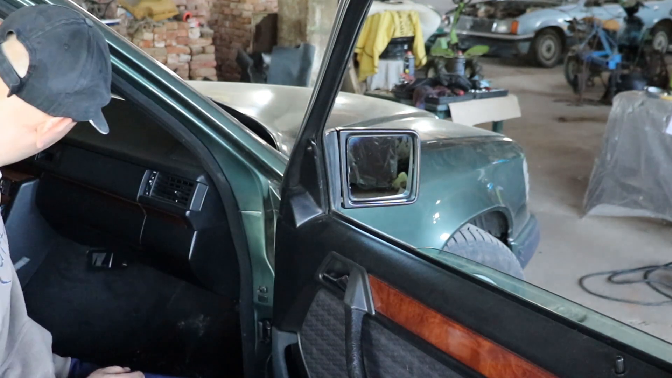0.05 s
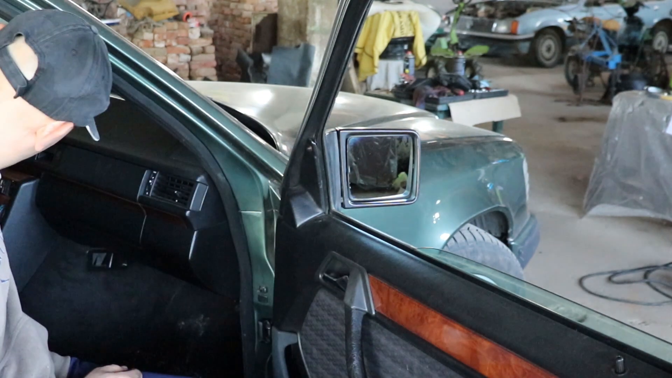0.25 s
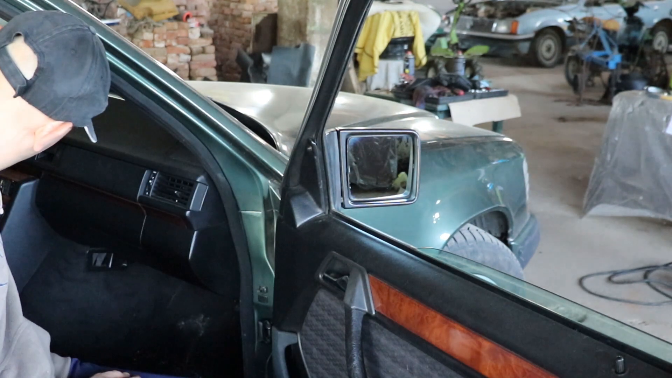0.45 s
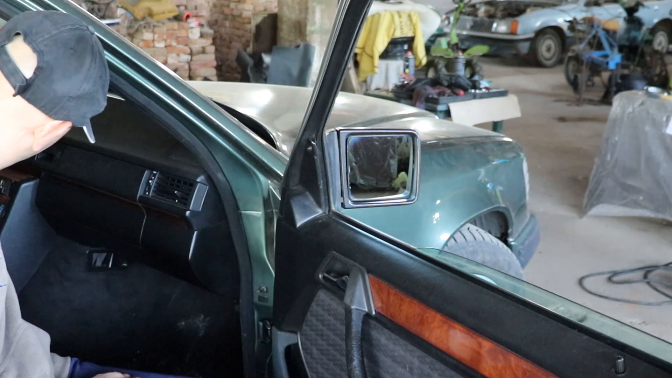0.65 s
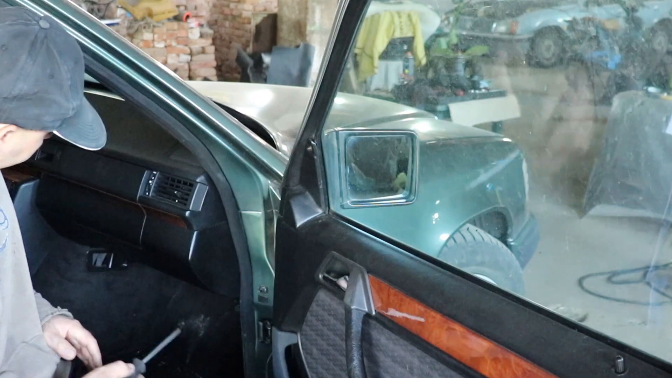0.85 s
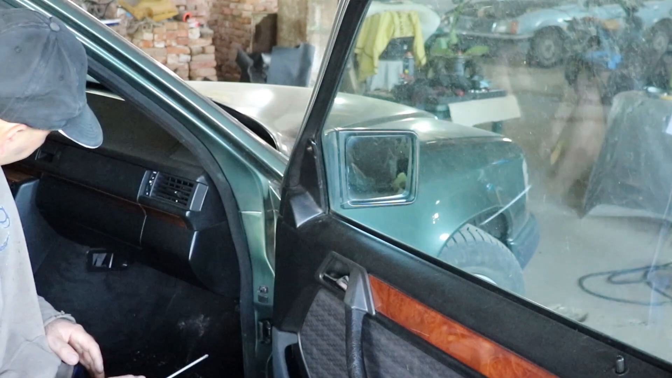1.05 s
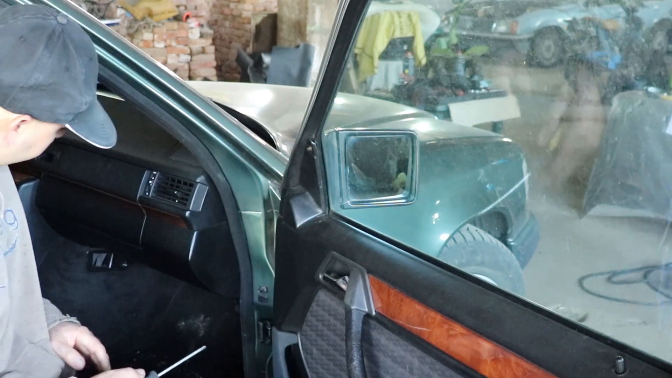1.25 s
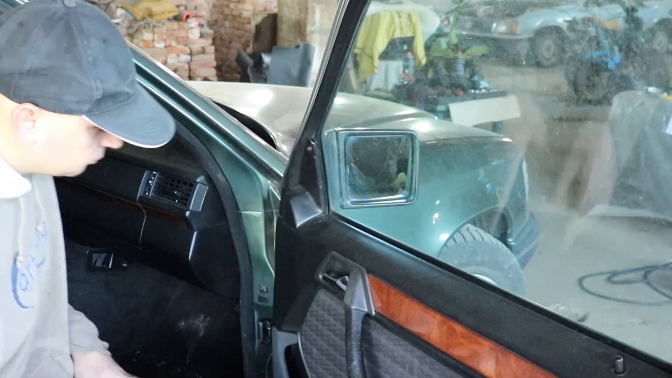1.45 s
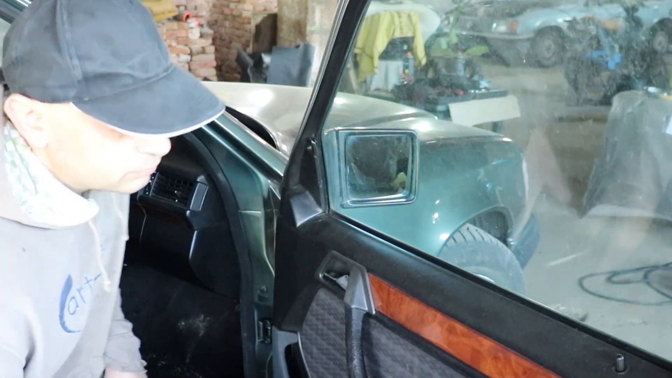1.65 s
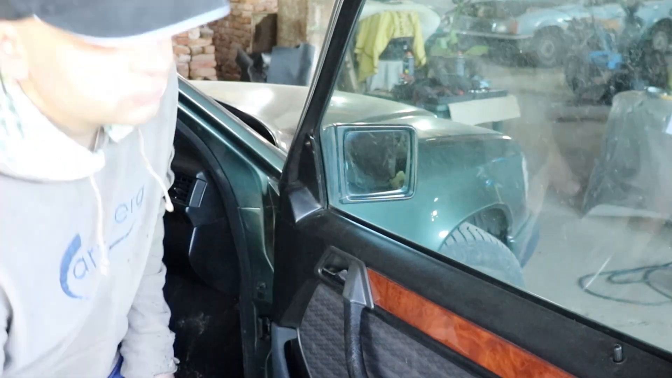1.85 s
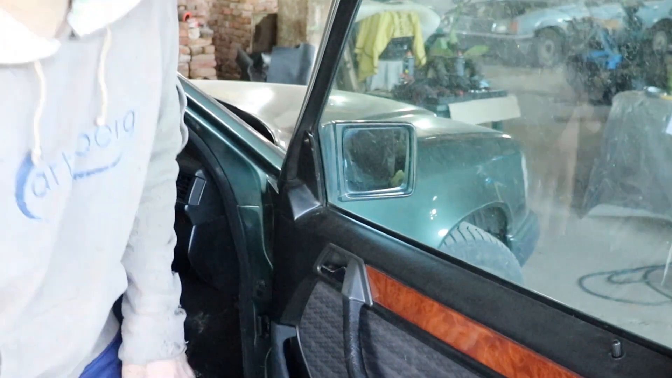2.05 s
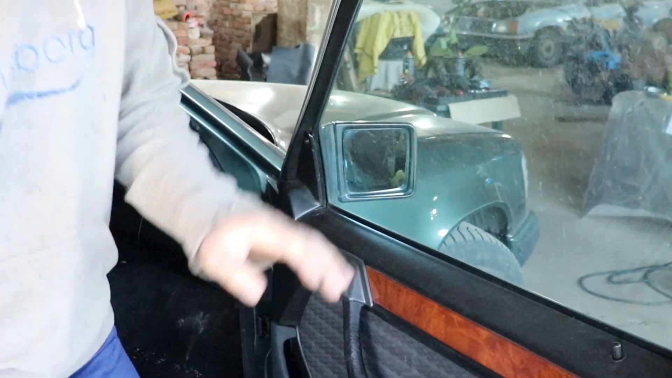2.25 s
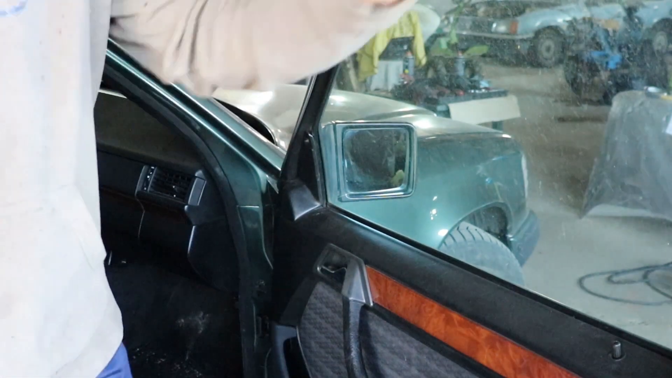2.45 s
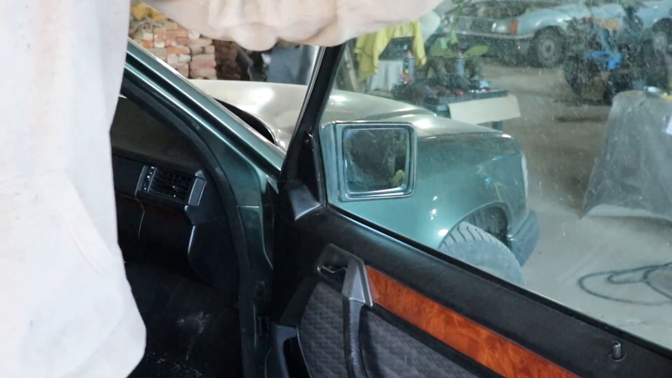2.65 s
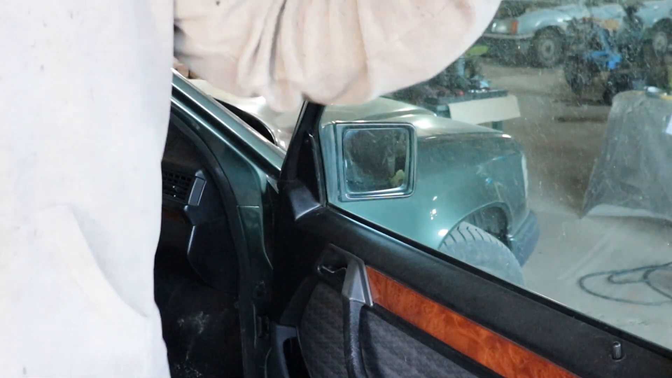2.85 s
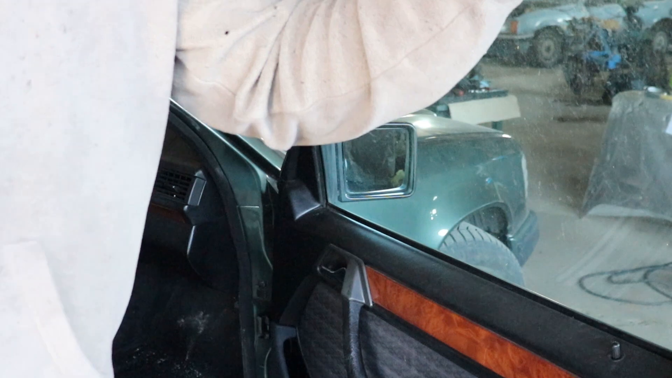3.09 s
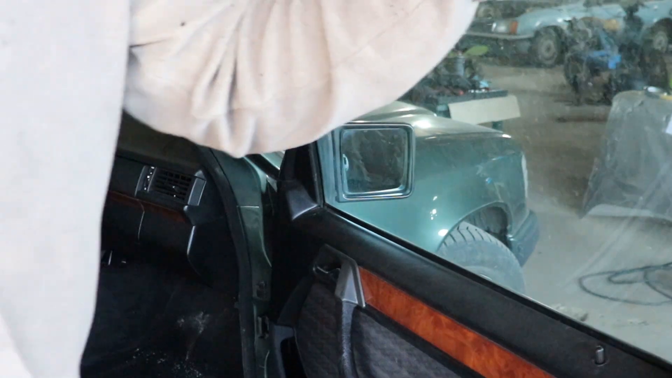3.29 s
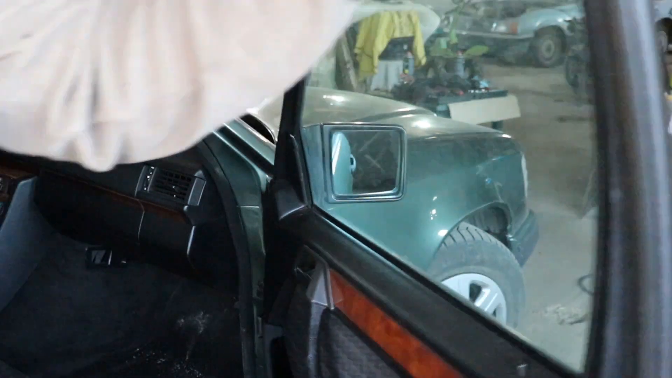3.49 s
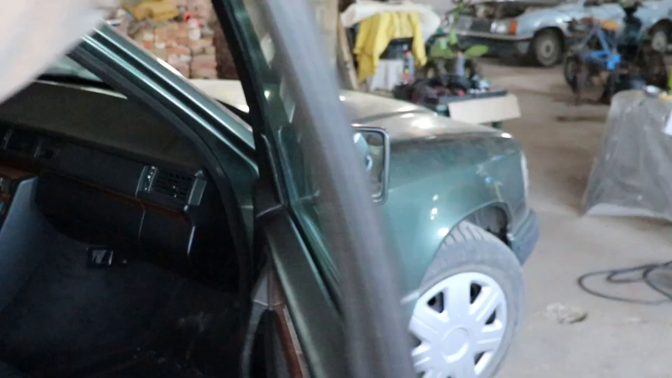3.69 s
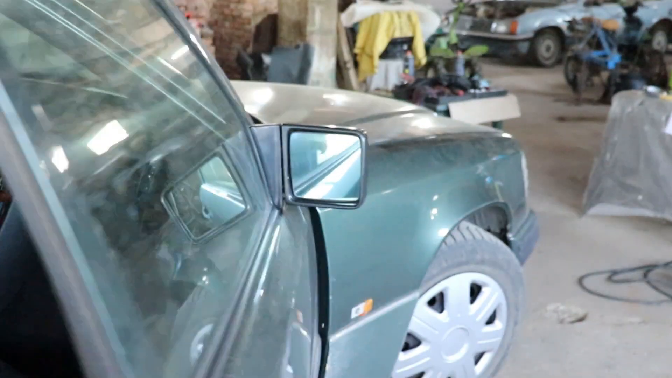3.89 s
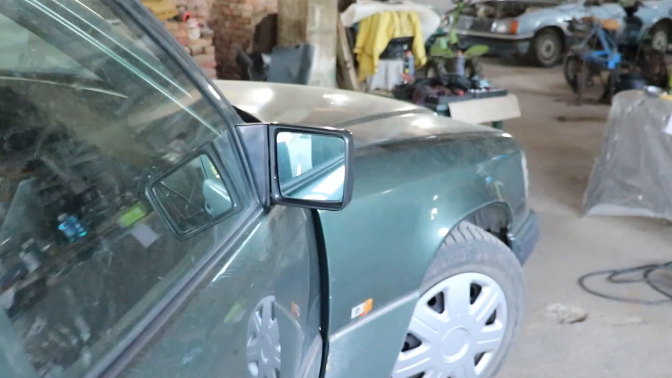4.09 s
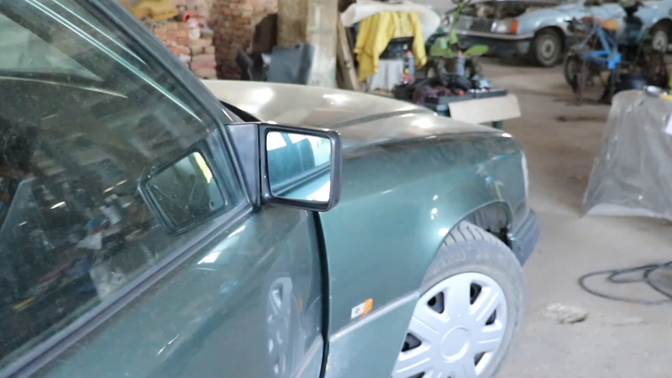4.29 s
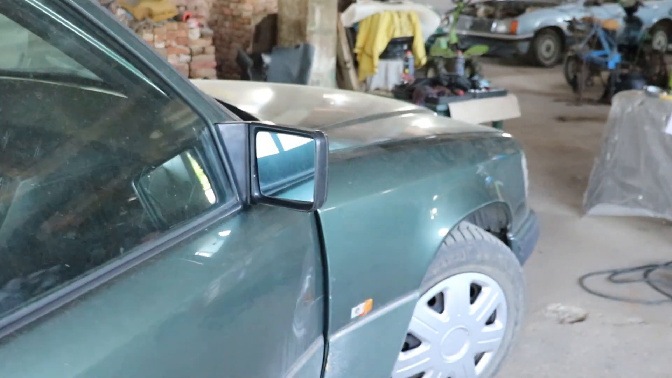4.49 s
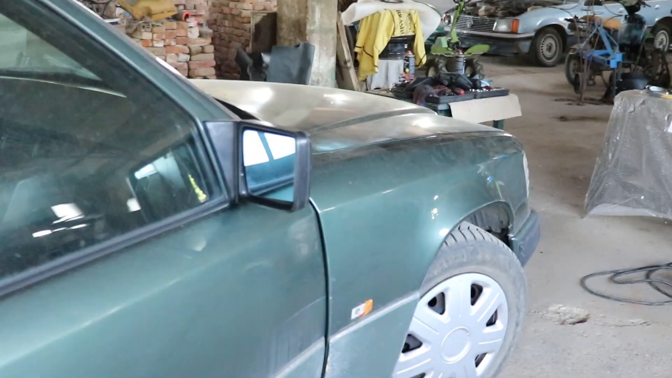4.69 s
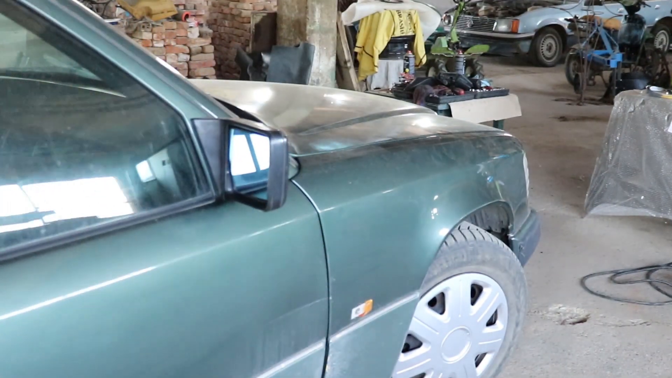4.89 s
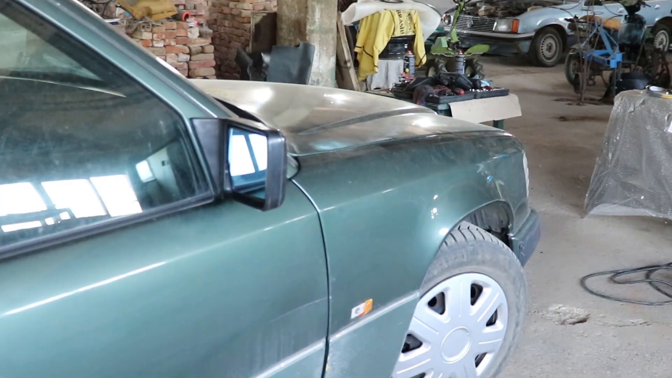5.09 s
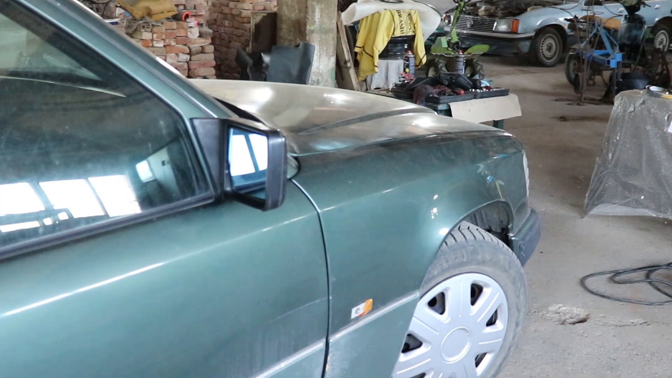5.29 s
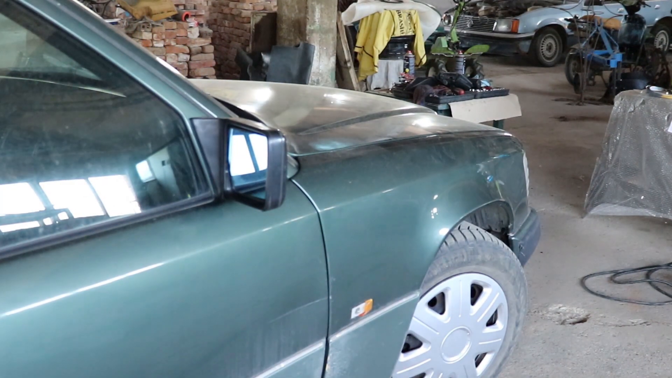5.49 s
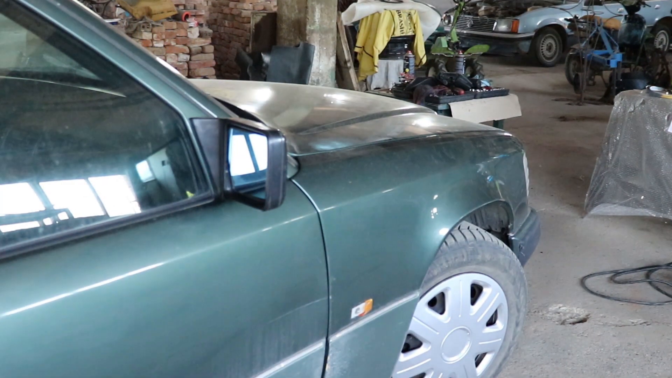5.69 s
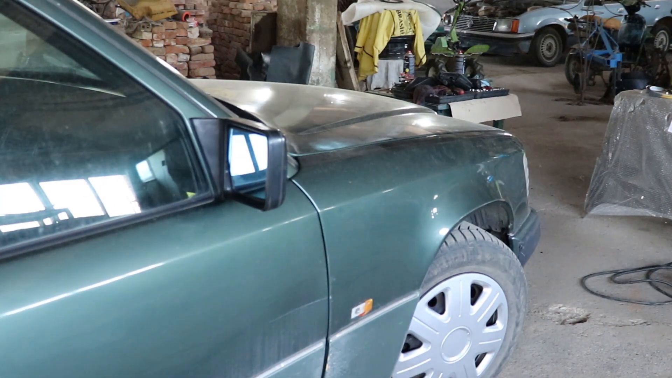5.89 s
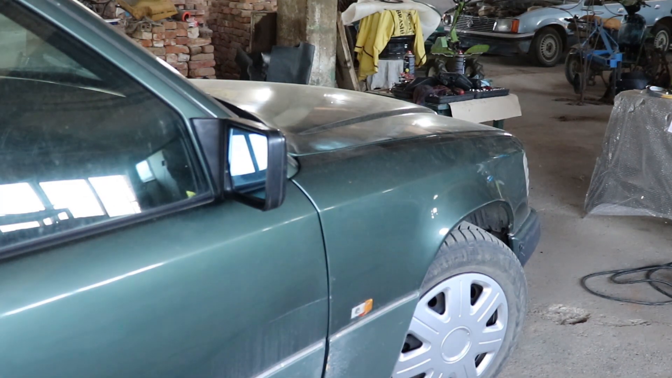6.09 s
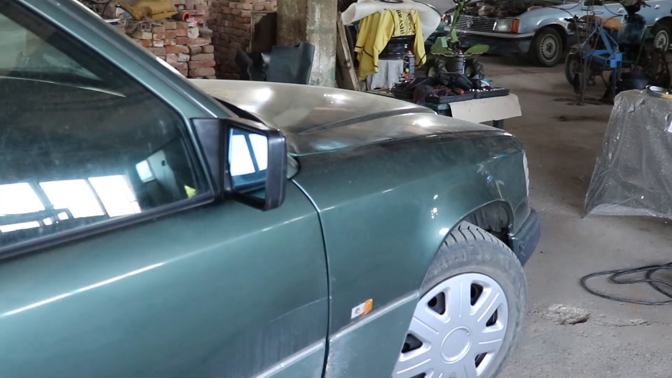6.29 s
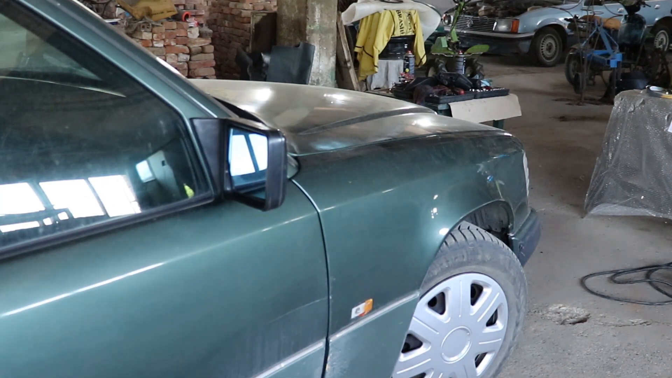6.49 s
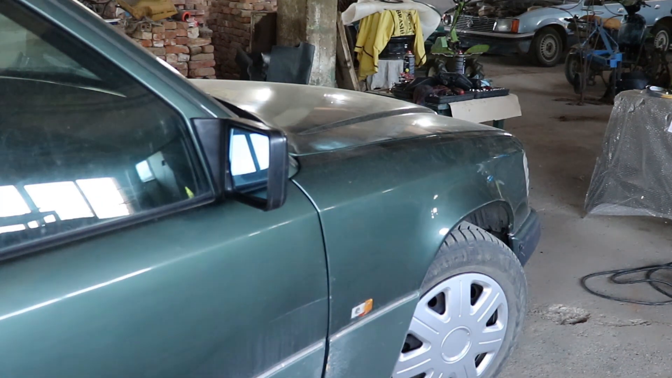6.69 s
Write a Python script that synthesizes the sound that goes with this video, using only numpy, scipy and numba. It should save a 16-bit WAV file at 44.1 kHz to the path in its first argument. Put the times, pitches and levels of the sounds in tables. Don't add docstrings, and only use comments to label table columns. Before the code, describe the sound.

Close to a stereo microphone pair in a large workshop, a person leaves a car seat: clothing rubs, small hard clicks, a short leather creak. The door then moves with light rattles, its check strap snaps with a hard knock, and about a second later it slams loudly with a latch crack, rattling panel and low boom, ringing into the hall over faint hush and hum.

```python
import sys
import numpy as np
from scipy import signal
from scipy.fft import rfft, irfft, next_fast_len
from scipy.io import wavfile
from scipy.ndimage import uniform_filter1d
from numba import njit

SR = 44100
rng = np.random.default_rng(int(sys.argv[2]) if len(sys.argv) > 2 else 0)


def attenuation_scalar(level_db):
    decades = np.asarray(level_db, float) / 20
    return 10 ** decades


def generate_wav(signal):
    frames = np.transpose(np.atleast_2d(signal))
    scaled = np.clip(frames, -1, 1) * 32767
    pcm = np.round(scaled).astype(np.int16)
    wavfile.write(sys.argv[1], SR, pcm)


N = 297234
TIME = np.arange(N) / SR
BLOW = 4096

# f/Hz, likeness/0-1
ALIKE_IN_HALL = [(60, .99), (130, .98), (290, .93), (640, .74), (1410, .25), (3100, 0)]


def on_log(table, hz):
    at, value = np.transpose(table)
    return np.interp(np.log(hz + 1), np.log(at), value)


def ring(x, hz, width_hz):
    return signal.lfilter(*signal.iirpeak(min(hz, .45 * SR), hz / width_hz, SR), x)


def body(x, modes):
    x = np.atleast_2d(x)
    return sum(attenuation_scalar(db) * ring(x[k % len(x)], hz, width) for k, (hz, width, db) in enumerate(modes))


def unit(x):
    return x / np.sqrt(np.mean(x ** 2))


def swells(rows, extra_db=0):
    s, rise, fall, db = np.transpose(rows)[:4, :, None]
    coarse = TIME[::44]
    below = np.where(coarse < s, (s - coarse) / np.abs(rise), (coarse - s) / np.abs(fall))
    level_db = db + extra_db - 12 * below ** 1.04
    return np.interp(TIME, coarse, np.sqrt(np.sum(attenuation_scalar(level_db) ** 2, axis=0)))


def stereo_noise(size, alike):
    fast = next_fast_len(size)
    c = np.clip(on_log(alike, np.fft.rfftfreq(fast, 1 / SR)), 0, 1)
    mid, side = rfft(rng.standard_normal((2, fast))) * np.sqrt([(1 + c) / 2, (1 - c) / 2])
    return irfft([mid + side, mid - side], fast)[:, :size]


def add(out, near, far, s, peak_db):
    i = int(s * SR)
    near = near * attenuation_scalar(peak_db) / np.abs(near).max()
    far = far * np.sqrt(np.sum(near ** 2) / np.sum(far ** 2))
    out[:, i:i + len(near)] += np.array([near, far])[:, :N - i]


def tap():
    return 1. * (np.arange(BLOW) == 40)


def contact(ms, swell=1):
    u = np.arange(BLOW) / SR / (max(ms, .5) / 2000)
    return u ** swell * np.exp(-u ** 2)


def blows(thuds, clicks, thud_q, click_q, broad):
    out = np.zeros((2, N))
    high = signal.butter(2, 1200, "high", fs=SR, output="sos")
    for (s, db, hz, ms), grit in zip(thuds, rng.standard_normal((len(thuds), BLOW))):
        tone = np.sin(2 * np.pi * hz * np.arange(BLOW) / SR)
        push = contact(ms) * (tone + 1.7 * ring(grit, hz, 2 * hz))
        add(out, ring(push, hz, hz / thud_q), ring(ring(tap(), hz, hz), hz, hz), s - .001, db)
    for (s, db, hz, ms), grit in zip(clicks, rng.standard_normal((len(clicks), BLOW))):
        bright = signal.sosfilt(high, [contact(ms, swell=.3) * grit, tap()])
        wide = broad * ring(bright, 2940, 2800)
        near = ring(bright[0], hz, hz / click_q) + wide[0]
        far = ring(bright[1], hz, hz / 2) / np.sqrt(click_q / 2) + wide[1]
        add(out, near, far, s, db)
    return out


def apart(table, ms):
    thuds = [(s, db, hz, ms) for s, db, hz, _, _ in table]
    clicks = [(s, db, hz, ms) for s, _, _, db, hz in table]
    return thuds, clicks


def floor():
    # f/Hz, density/dB per Hz
    hush_shape = [(12, -32), (24, -19), (65, -8), (210, -5), (738, -7), (7730, -20), (13000, -25),
                  (16000, -26.5)]
    # f/Hz, likeness/0-1
    hush_alike = [(60, 0), (130, 0), (290, 0.39), (640, 0.4), (1410, 0.072), (3100, 0.0), (6820, 0),
                  (15000, 0.09)]
    # f/Hz, width/Hz, level/dB
    machines = [(61.4, 9.3, -70), (108, 18, -73)]
    drift = attenuation_scalar(0.56 * unit(uniform_filter1d(rng.standard_normal(N), 9000)))
    fast = next_fast_len(N)
    shape = attenuation_scalar(on_log(hush_shape, np.fft.rfftfreq(fast, 1 / SR)))
    hush = unit(irfft(rfft(stereo_noise(fast, hush_alike)) * shape, fast)[:, :N])
    hum = 0
    for hz, width, db in machines:
        hum = hum + attenuation_scalar(db) * unit(ring(ring(rng.standard_normal(N), hz, 2 * width), hz, width))
    return attenuation_scalar(-55.5) * drift * hush + hum


def cloth():
    # peak t/s, rise/s, fall/s,
    # level/dB, brightness (-1 dull rub to 1 hiss)
    movements = [(0, .1, 0.079, -54, -0.55), (.3, 0.088, 0.079, -54, -0.52), (.39, .03, 0.14, -58, -0.45),
                 (.98, 0.13, 0.19, -58, -0.15), (1.221, .03, 0.022, -48.5, -0.22),
                 (1.27, 0.027, 0.15, -51, -0.048), (1.59, 0.19, 0.2, -47.5, -0.24),
                 (1.8, 0.082, .1, -54.5, 0.053), (1.88, .1, 0.12, -52, 0.41), (2.13, 0.11, 0.21, -59, 1),
                 (2.45, 0.11, 0.14, -52.5, 0.45), (2.65, 0.27, 0.5, -60, -0.12),
                 (2.84, 0.11, 0.36, -49.5, 0.42), (3.33, 0.31, 0.43, -54.5, 0.44),
                 (3.6, 0.077, 0.26, -52, -1.3), (3.62, 0.079, 0.35, -56, 0.92),
                (3.763, 0.02, 0.048, -40, 0.67), (4.146, 0.037, 0.56, -64, -1.2),
                (4.195, 0.027, 0.041, -48.5, 1.08), (4.471, 0.063, 0.072, -50.5, 0.98),
                (4.73, 0.45, 0.33, -59, -0.23), (4.85, 0.022, 0.086, -51.5, 0.42),
                (5.022, 0.024, 0.04, -45, -0.5), (5.778, 0.15, 0.16, -52.5, .3),
                (6.05, 0.4, 0.42, -62.5, 0.48), (6.2, 0.052, 0.066, -56, 0.98),
                (6.25, 0.038, 0.054, -50.5, 0.94), (6.366, 0.037, 0.15, -60, -0.97),
                (6.55, 0.45, 0.22, -64, 1.24), (6.69, 0.055, 0.1, -55.5, -1.67)]
    # level at brightness 0/dB, slope/dB per unit of brightness
    bright_db = [(3, -7), (-1.5, 2), (-7.5, 9.5)]
    # peak t/s, rise/s, fall/s, level/dB
    weight = [(.3, .06, 0.36, -63), (1.29, 0.055, 0.25, -61), (1.59, 0.27, 0.095, -59),
              (1.81, 0.06, 0.33, -61), (2.4, 0.47, 0.42, -62.5), (2.83, 0.034, 0.24, -57),
              (3.68, 0.18, .13, -55.5), (4.146, 0.063, 0.22, -48.5), (4.468, 0.17, 0.22, -56.5),
              (4.8, 0.15, .3, -62), (5.7, .05, 0.13, -50), (6.366, 0.016, 0.2, -45), (6.74, 0.065, .1, -50)]
    moves = np.array(movements)
    layers = [swells(moves, db + slope * moves[:, 4:]) for db, slope in bright_db] + [swells(weight)]
    # f/Hz, width/Hz, grain spread/dB
    grains = [(420, 1030, 2.76), (1770, 3500, 1.93), (6500, 5400, 3.2), (75.5, 64, 0.44)]
    out = 0
    for gain, (hz, width, spread_db) in zip(layers, grains):
        sizes = np.minimum(rng.exponential(size=N // 64 + 1), 4)
        crackle = attenuation_scalar(spread_db * np.repeat(sizes, 64)[:N]) * stereo_noise(N, ALIKE_IN_HALL)
        out = out + gain * unit(ring(ring(crackle, hz, 1.24 * width), hz, width))
    return out


def ticks():
    # t/s, thud peak/dB, thud f/Hz, click peak/dB, click f/Hz
    small = [(0.236, -44.5, 524, -45, 1420), (0.294, -47, 550, -27, 1400), (0.376, -48, 480, -27.5, 1640),
             (0.417, -57, 510, -39.5, 1710), (0.874, -47.5, 261, -52, 1400), (1.001, -63, 460, -38.5, 1430),
             (1.167, -44.5, 641, -43.5, 1540), (1.208, -45, 806, -37, 1470),
             (1.257, -51, 1110, -35.5, 2700), (1.535, -47, 590, -40, 3220), (1.552, -34, 420, -35, 1360),
             (1.579, -43, 441, -29, 2200), (1.599, -42, 970, -32, 2120), (1.619, -48, 177, -37, 1500),
             (1.77, -48, 183, -34.5, 1870), (1.854, -47, 250, -32, 1890), (1.939, -53, 430, -42, 1900),
             (2.424, -76, 415, -33.5, 2560), (2.846, -37, 760, -36, 1980), (3.306, -67, 398, -45, 3160)]
    return blows(*apart(small, ms=13.6), thud_q=4.1, click_q=8.2, broad=0.21)


def creaks():
    # t/s, slip rate f/Hz, level/dB
    creak = [
        (1.76, 201.5, -53),
        (1.786, 206.5, -46.5),
        (1.858, 236.6, -51.5),
        (1.895, 212.6, -49),
        (1.924, 211, -51),
        (1.96, 221, -66),
    ]
    # t/s, length/s, f/Hz, level/dB
    squeaks = [
        (0.4, 0.84, 4390, -67),
        (1.006, 0.1, 680, -58),
        (2.975, 0.17, 555, -51),
    ]
    s, hz, db = np.transpose(creak)
    wobble = uniform_filter1d(rng.standard_normal(N), 200)
    wobble = unit(wobble - uniform_filter1d(wobble, size=8000))
    turns = np.cumsum(np.interp(TIME, s, hz) * (1 + 0.05 * wobble)) / SR
    slips = np.diff(np.floor(turns), prepend=0) * attenuation_scalar(6 * wobble)
    level = attenuation_scalar(np.interp(TIME, [s[0] - .01, *s, s[-1] + .03], [-99, *db, -99]))
    out = level * unit(body(slips, [(208, 55, 7.5), (450, 270, -1), (1030, 280, 4.5)]))
    for start, length, hz, db in squeaks:
        swell = np.sin(np.pi * np.clip((TIME - start) / length, 0, 1))
        out += attenuation_scalar(db) * swell * np.sin(2 * np.pi * hz * np.cumsum(1 + 0.023 * wobble) / SR)
    return out


def door_swing():
    # t/s, thud peak/dB, thud f/Hz, click peak/dB, click f/Hz
    rattles = [(3.597, -30, 517, -47, 2400), (3.59, -34, 205, -37, 5200), (3.766, -27.5, 1190, -25, 1380),
               (4.418, -55.5, 506, -36, 7550), (4.455, -61, 560, -34.5, 7260),
               (4.472, -63, 560, -32.5, 3400), (4.496, -56, 538, -33, 3670),
               (4.848, -40.5, 149, -31.5, 7000), (6.175, -57, 236, -45, 2330), (6.238, -48, 600, -54, 1670),
               (6.429, -37.5, 168, -48, 2620), (6.487, -47, 154, -42, 3140), (6.64, -39, 417, -54, 1230),
               (6.682, -39, 600, -56, 1500), (6.697, -34, 219, -55, 1620), (6.724, -43, 216, -59, 1910)]
    # t/s, peak/dB, f/Hz, contact/ms
    knock_thuds = [(2.834, -32, 305, 5.1), (3.258, -35.5, 780, 4.2), (3.584, -32, 513, 5.3),
                   (3.853, -27, 420, 5.7), (3.942, -14.5, 610, 3.7), (3.944, -28, 210, 12),
                   (3.951, -15.5, 408, 10), (3.96, -16, 480, 12), (6.351, -41, 600, 3.4),
                   (6.356, -29.5, 155, 8.5), (6.659, -29, 780, 6), (6.664, -38, 553, 14)]
    knock_clicks = [
        (2.835, -50, 1400, 5.9),
        (3.259, -37, 2200, 6.3),
        (3.584, -56, 1500, 6.6),
        (3.853, -16, 3550, 10),
        (3.942, -18, 1650, 6.4),
        (3.944, -26, 3500, 11),
        (6.351, -42, 1540, 2.1),
        (6.66, -34, 1330, 7.8),
    ]
    light = blows(*apart(rattles, ms=10.2), thud_q=0.67, click_q=25.0, broad=0.28)
    return light + blows(knock_thuds, knock_clicks, thud_q=0.35, click_q=3.6, broad=0.024)


def strap():
    # f/Hz, width/Hz, level/dB
    close_modes = [(334, 116, -3.5), (600, 630, -4), (1110, 145, 8), (1620, 64, 9), (2400, 640, -5),
                   (3150, 720, -9), (4500, 590, -17), (7000, 3700, -24)]
    # f/Hz, width/Hz, level/dB
    pillar = [(480, 130, 4), (1300, 700, 4.5), (3140, 7500, -28)]
    out, hit = np.zeros((2, N)), tap()
    snap = rfft(contact(6.2, swell=1.37) * rng.standard_normal(BLOW))
    snap = irfft(snap / np.sqrt(uniform_filter1d(np.abs(snap) ** 2, size=12)))
    add(out, body([snap, -snap], close_modes), body([hit, -hit], pillar), 3.8525, -3.5)
    return out * attenuation_scalar(np.array([[0], [4.0]]))


def shudder():
    # f/Hz, width/Hz, level/dB
    panel_modes = [(140, 22, -8), (224, 26, 8.5), (315.5, 11, 16.5), (400, 260, -1), (468, 27, 12.5),
                   (534, 180, -1), (810, 80, -19), (1130, 91, -0.5), (1400, 380, -28), (2200, 1030, -15.5)]
    cabin_modes = [(35, 48, -3.5), (58, 7.6, 5.5), (94, 78, -3.5)]
    # peak t/s, rise/s, fall/s, level/dB
    jolts = [
        (3.94, 0.0026, 0.039, -22.5),
        (4.026, .03, .065, -44),
        (4.134, .02, 0.32, -48.5),
        (4.488, 0.011, 0.063, -48),
        (5.045, 0.0042, 0.01, -9.5),
        (5.127, 0.013, 0.064, -18),
        (5.22, .04, 0.015, -23),
        (5.3, .04, .08, -54),
        (5.545, 0.029, 0.11, -42.5),
    ]
    booms = [
        (3.956, 0.006, 0.062, -37),
        (4.026, 0.026, 0.02, -31.5),
        (5.07, 0.011, 0.045, -21.5),
        (5.199, 0.082, 0.0096, -20),
        (5.263, 0.019, 0.04, -28.5),
        (5.35, .04, 0.15, -42),
        (5.545, 0.029, 0.43, -47.5),
        (5.935, 0.094, .16, -57),
    ]
    uneven = np.repeat(rng.standard_normal(N // 256 + 1), 256)[:N]
    shake = attenuation_scalar(3.25 * uneven) * rng.standard_normal((2, N))
    skin = body(shake, panel_modes) + attenuation_scalar(0.5) * ring(shake[0], 270, 560)
    air = ring(body(rng.standard_normal((2, N)), cabin_modes), 45, 165)
    return swells(jolts) * unit(skin) + swells(booms) * unit(air)


def slam():
    # t/s, peak/dB, f/Hz, contact/ms
    seal_thuds = [(5.019, -29, 600, 11), (5.028, -8, 400, 13.8), (5.0455, -4.5, 704, 7),
                  (5.047, -6, 1300, 5.7), (5.0575, -21, 714, 6.9), (5.067, -12, 365, 2.8),
                  (5.107, -16.5, 430, 7.2), (5.118, -10.5, 1240, 6.8), (5.1225, -13, 600, 3.9),
                  (5.132, -7.5, 540, 2.2), (5.149, -20, 480, 15), (5.164, -15, 480, 33),
                  (5.186, -17.5, 468, 9.4), (5.199, -17.5, 215, 4.5), (5.283, -35, 400, 3.9)]
    latch_clicks = [(5.019, -33, 5440, 9.7), (5.032, -27, 2300, 10), (5.041, -14, 4970, 6.5),
                    (5.0456, 4.5, 2080, 3.4), (5.047, -3.5, 7040, 7.9), (5.058, -3, 6500, 2.7),
                    (5.066, -17, 1700, 3), (5.105, -20, 4000, 9.7), (5.119, -10.5, 2500, 9.4),
                    (5.1228, -15, 5250, 11), (5.149, -18.5, 7150, 14), (5.185, -16.5, 4650, 19),
                    (5.283, -22, 4500, 4.1)]
    return blows(seal_thuds, latch_clicks, thud_q=0.42, click_q=4.9, broad=0.61)


def hall(x):
    # f/Hz, T60/s
    t60 = [(60, 0.6), (250, 1.01), (700, 1.075), (2000, 1.14), (5000, 0.6), (11000, 0.06)]
    t = np.arange(65536) / SR
    noise, tail = stereo_noise(65536, ALIKE_IN_HALL), 0
    for hz in 45 * 2 ** np.arange(0, 9, .5):
        if hz < 17000:
            fade_db = -60 * t / on_log(t60, hz) - 2.5 * np.log2(hz / 500)
            tail = tail + ring(noise, hz, hz / 3) * attenuation_scalar(fade_db)
    tail *= (1 - np.exp(-t / 0.004)) * (1 + 1.4 * np.exp(-t / 0.023))
    return signal.fftconvolve(x[None], tail / np.sqrt(np.sum(tail ** 2) / 2), axes=1)[:, :N]


def heard(x, lead_ms, balance, near_db):
    size = next_fast_len(N + 2048)
    hz = np.fft.rfftfreq(size, 1 / SR)
    half = attenuation_scalar(on_log(balance, hz) / 2) * np.exp(1j * np.pi * hz * lead_ms / 1000)
    direct = np.array([half, 1 / half])
    near = stereo_noise(2048, ALIKE_IN_HALL) * np.exp(-np.arange(2048) / SR / .003)
    near = rfft(near / np.sqrt(np.sum(near ** 2) / 2), size)
    paths = direct + attenuation_scalar(near_db) * hz / (hz + 1500) * near
    even = np.sqrt(uniform_filter1d(np.abs(paths) ** 2, size=size // 100))
    even = even / np.abs(direct)
    return irfft(rfft(x, size) * paths / even, size)[:, :N]


def scene():
    # f/Hz, difference/dB
    door_side = [(60, 2.5), (380, .5), (700, 2), (1290, 3), (2380, -.5), (4400, 0), (8120, 2.5),
                 (15000, 7.5)]
    # t/s, left minus right/dB
    side_shift = [
        (0, -0.5),
        (3.5, 0.2),
        (6.74, 1),
    ]
    seat = ticks() + creaks()
    shade = signal.butter(1, 7000, fs=SR, output="sos")
    swing = signal.sosfilt(shade, door_swing() + strap())
    skin, shut = shudder(), slam()
    wet = hall(attenuation_scalar(-14) * seat[1] + attenuation_scalar(-14.5) * swing[1] + attenuation_scalar(-11) * shut[1] + attenuation_scalar(-13.5) * skin)
    direct = heard(seat[0], 0.039, [(100, 0), (10000, 0.24)], near_db=3.0)
    direct += heard(swing[0], 0.03, door_side, near_db=-15)
    direct += heard(shut[0] + attenuation_scalar(-3.0) * skin, 0.15, door_side, near_db=4.0)
    side_shift_db = np.interp(TIME, *np.transpose(side_shift))
    return direct + (wet + cloth() + floor()) * attenuation_scalar(np.array([side_shift_db, -side_shift_db]) / 2)


@njit
def follow(x, attack, release):
    out, e = np.empty(len(x)), 0.
    for i in range(len(x)):
        e += (x[i] - e) * (attack if x[i] > e else release)
        out[i] = e
    return out


def low_pass(x):
    return signal.sosfilt(signal.butter(12, 16800, fs=SR, output="sos"), x)


def record(dry):
    loud = follow(np.abs(dry).max(axis=0), 1 / (0.02 * SR), 1 / (.12 * SR))
    ducked = dry * (attenuation_scalar(-18.0) / np.maximum(loud, attenuation_scalar(-18.5))) ** .5
    rounded = .82 * np.tanh(ducked / .82)
    top = signal.ellip(8, .5, 45, 15750, fs=SR, output="sos")
    return low_pass(signal.sosfilt(top, rounded))


dry = scene()
out = record(dry)
generate_wav(out)
```